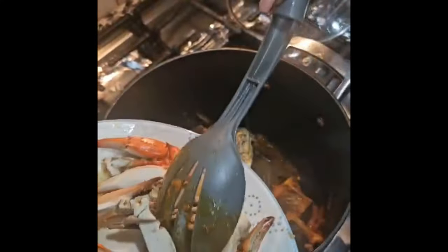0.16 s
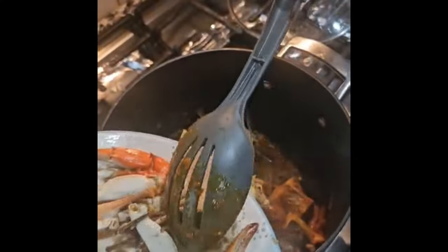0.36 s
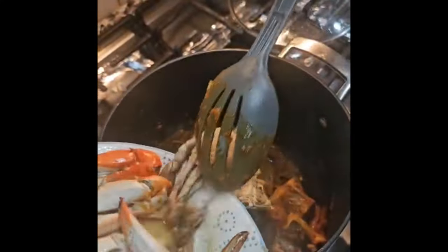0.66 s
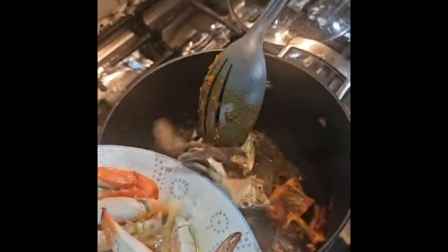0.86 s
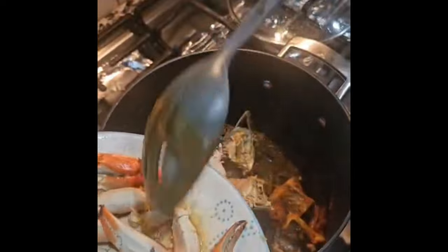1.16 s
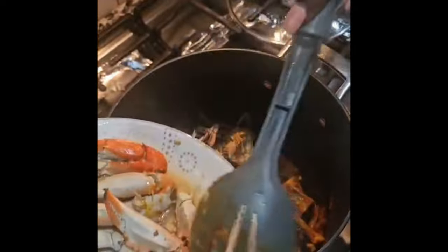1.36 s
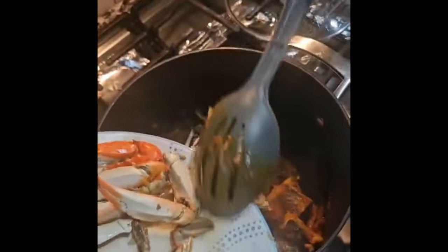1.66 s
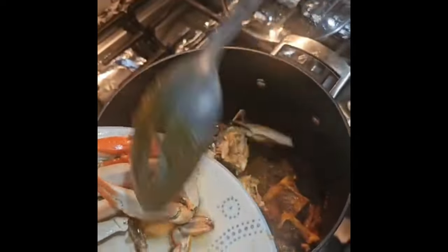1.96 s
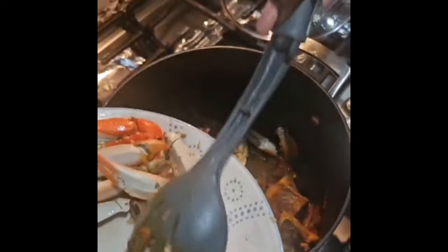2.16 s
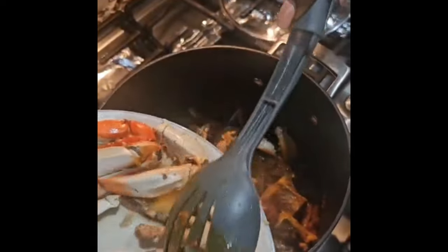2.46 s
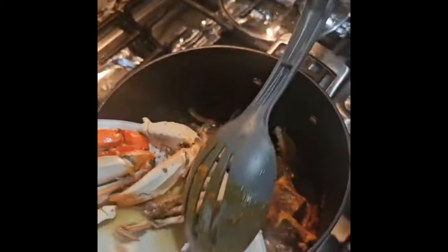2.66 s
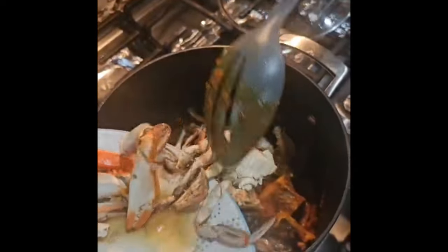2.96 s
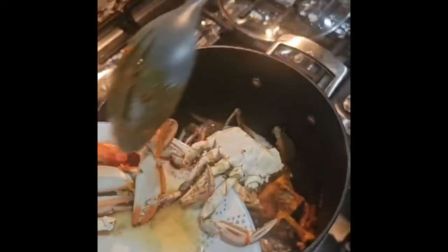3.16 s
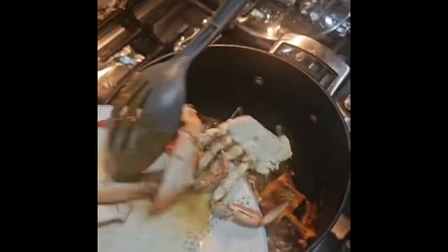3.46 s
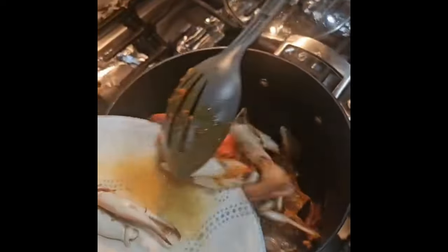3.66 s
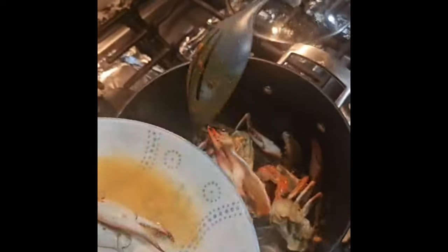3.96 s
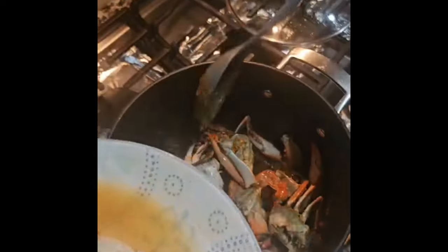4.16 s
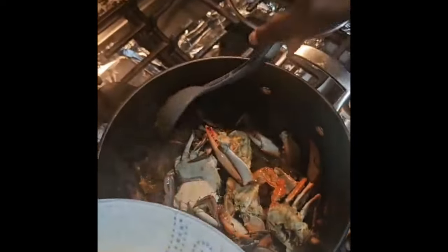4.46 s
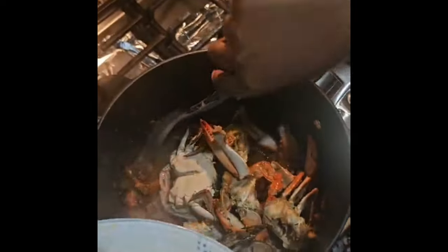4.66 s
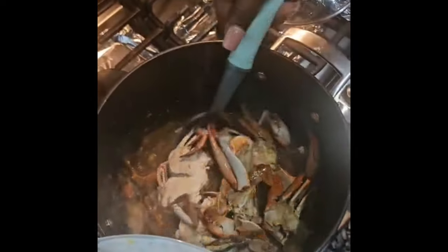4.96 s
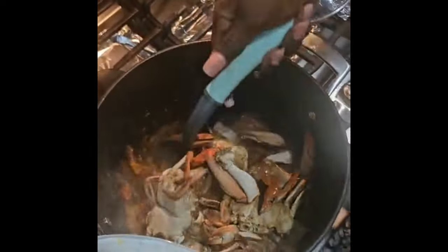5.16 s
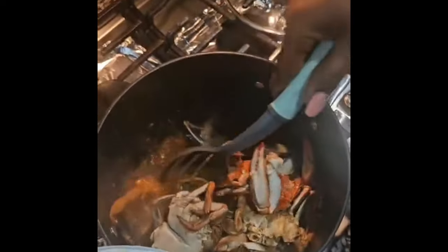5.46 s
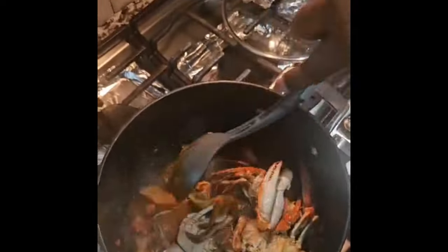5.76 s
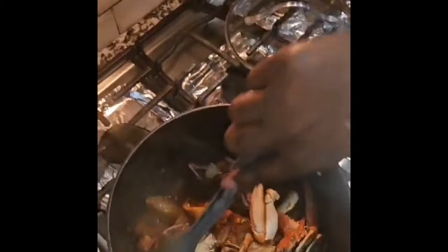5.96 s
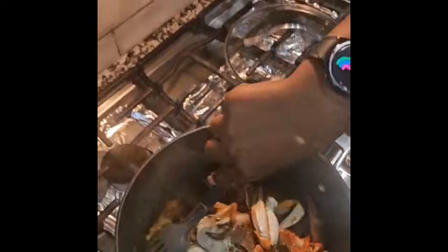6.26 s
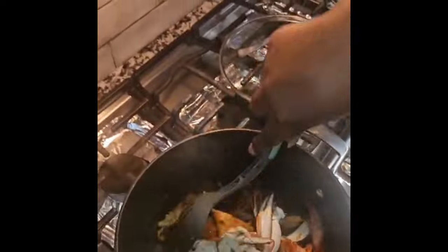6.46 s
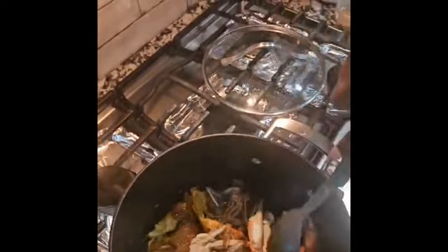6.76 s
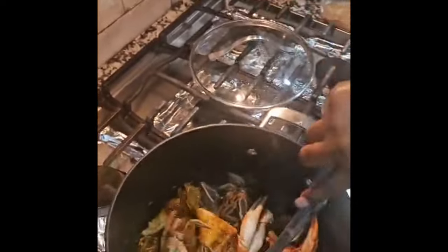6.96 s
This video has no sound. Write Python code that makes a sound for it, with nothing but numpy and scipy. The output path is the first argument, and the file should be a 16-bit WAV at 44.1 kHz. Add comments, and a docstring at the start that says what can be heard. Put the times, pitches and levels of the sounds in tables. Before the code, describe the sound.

Hard shells click and clatter off a plate into a frying pot with dull thuds and flaring sizzle, followed by softer stirring and wall scrapes.

```python
"""A kitchen stove: a plastic slotted spoon scrapes cooked crab off a china plate into frying sauce, then stirs.
Shell ticks are noise bursts that ring small resonances and the plate's modes; one strike is especially hard.
Soft thuds ring the pot and boom on the stove, shoved food groans in two low tones, and the pot's rim rings.
Clumped random slips make the scraping; steam hiss, pitched pops and fine spray make the sizzle.
A low hum with one broad tone and the rumble of the rocking pot lie beneath; short echoes give the room."""
import sys
import numpy as np
from scipy import signal
from scipy.fft import rfft, irfft
from scipy.io import wavfile

SR = 44100
rng = np.random.default_rng(int(sys.argv[2]) if len(sys.argv) > 2 else 0)


def file_out(sig):
    """Save sig as 16-bit WAV at sys.argv[1]."""
    # one column per channel
    cols = np.atleast_2d(sig).T
    # limit, then scale
    lim = np.clip(cols, -1, 1)
    pcm = np.round(lim * 32767).astype(np.int16)
    wavfile.write(sys.argv[1], SR, pcm)


N = 313551
TIME = np.arange(N) / SR  # seconds

# Frying, livelier while stirring bares the hot bottom: time_s, level_db
FRYING_LEVEL = [(0, -60), (1.2, -57.5), (2.3, -59.5), (3.3, -59.5), (4.45, -59.5), (5.0, -57),
                (5.85, -56.5), (6.4, -59), (6.8, -61), (7.11, -66)]
# Wet food meets the hot pot and the sizzle flares: start_s, level_db
FLARES = [(.9, -61), (1.62, -55), (2.0, -54.5), (3.62, -51), (3.8, -45.5), (4.17, -53.5), (6.95, -50.5)]
# Relative spectra of steam hiss and pops, and of the finest fizz: freq_hz, density_db
SIZZLE_COLOUR = [(400, -33), (1000, -18), (2500, 4.5), (5000, 4.5), (8000, 2), (11000, -4), (14000, -2),
                 (16000, -4.5)]
SPRAY_COLOUR = [(2000, -38), (6000, -11), (9000, -4), (12000, 3), (14000, 1), (16000, -1.5)]
# Relative spectra of the kitchen hum and of the pot rocking on its grate: freq_hz, density_db
HUM_COLOUR = [(15, -73), (25, -60), (54, -22), (81, -34), (108, -19), (162, -6), (221, -2.5), (243, -5),
              (401, 2.5), (578, -9), (936, -8), (1200, -12), (1490, -9), (2100, -16.5), (2500, -15),
              (3250, -12.5), (5500, -120)]
RUMBLE_COLOUR = [(15, -4), (30, -17), (47, 4), (62, 1), (85, -8), (130, 14), (200, 0), (400, -72),
                 (1000, -101)]
# Pushes of the spoon, first over the plate, then through the pot: start_s, length_s, rubbing_db
STROKES = [(0, 0.038, -47.5), (0.563, 0.43, -48), (1.5, 0.3, -43.5), (1.95, 0.44, -51.5),
           (2.55, 0.071, -51), (2.85, 0.078, -51), (3.06, .04, -50), (3.415, 0.02, -43),
           (3.58, 0.39, -43.5), (4.106, 0.77, -54.5), (4.7, 0.047, -44.5), (4.84, 0.37, -45.5),
           (6.18, 0.3, -49.5), (6.9, 0.15, -48), (7.02, 0.035, -43)]
# Relative spectra of rubbing on the plate and of stirring in the pot: freq_hz, density_db
SCRAPE_COLOUR = [(150, -17), (400, 2), (650, -5.5), (950, 4), (1500, -2.5), (1900, -2), (2600, -7),
                 (4500, -3), (7000, -15), (14000, -30)]
STIR_COLOUR = [(150, -13), (400, 7), (650, 1), (860, 4), (1100, 0.5), (1400, 2.5), (1900, -2.5),
               (2800, -3.5), (4500, -4), (7000, -7.5), (14000, -27)]
# Distinct contacts of spoon and shell: start_s, strength_db, centre_hz, falloff_db_per_octave (either side),
# crunch_s, shell_hz (the piece's own resonance), shell_db (its height), plate_db (china ring),
# pan_db (left minus right)
CLICKS = [(0.011, -1, 955, 10, 0.0035, 1580, 8, -17, -2), (0.157, -2, 1650, 6.5, 0.0014, 1370, 5.5, -25, 1),
          (.29, -8, 1500, 11, 0.0027, 1520, 10, -6, 4), (0.338, -3, 1650, 21, 0.0014, 1590, 12.5, -2, 0),
          (0.516, -6, 875, 9, 0.0041, 6440, 20, -9, -3), (0.693, 2, 1560, 7.5, 0.0031, 3250, 9.5, -3.5, -2),
          (.705, -3, 2200, 4.5, 0.0017, 4480, 5, -18, 3), (0.7607, 4.5, 3140, 3, 0.0024, 1010, -1, -6.5, 0),
          (0.7836, 2.5, 1560, 16, 0.0055, 1520, 9, 3.5, -4), (.82, -8.5, 3500, 3.5, 0.0015, 5600, 3, -6, 1),
          (0.955, -0.5, 1300, 3, 0.006, 1490, 4.5, -2, 1), (.98, -4, 2000, 4.5, 0.0018, 1500, 0, -6, -3),
          (1.0635, -17, 3120, -2, 0.0029, 5340, 18.5, -10, 5),
          (1.0806, -5.5, 2930, 6.5, 0.0033, 4430, 9.5, 9, -3),
          (1.081, 1.5, 1100, 16, 0.0022, 1380, 11, -27, -2),
          (1.483, 3, 1740, 6, 0.0018, 3240, 8, -18, -1.5), (1.5319, 0, 2120, 7, 0.0014, 3360, 10, -5, 3),
          (1.5526, 4, 2320, 9.5, 0.0023, 4300, 11, -17, 0),
          (1.6222, 10.5, 4050, 0.5, 0.0029, 2450, 7, 11, -2.5),
          (1.6245, 10.5, 3320, 19, 0.0015, 3450, 6, -35, 7), (1.653, 2, 1400, 8, 0.0025, 1490, 5, -8, 10),
          (1.668, 6.5, 2800, 9, 0.005, 4400, 6, 0.5, -1), (1.675, -8, 3200, 3, .002, 5600, 8, 7, -4),
          (1.706, -21, 2500, 12, .0015, 2500, 6, 2, 0), (1.783, 10.5, 970, 7.5, 0.0071, 1480, 6, -21, 2),
          (1.7904, -5, 1480, 4, 0.0023, 1330, 22.5, 8.5, -5),
          (1.8245, -3, 2980, 5.5, 0.0013, 3070, -1, -10, -5), (1.834, 5, 2590, 9, 0.0035, 4470, 16, -1, -1),
          (1.843, -4, 4000, 18, .003, 5300, 12, -6, 6), (2.0055, -1, 900, 3, 0.0043, 5740, 8.5, -9, 2.5),
          (2.16, 1.5, 5020, 3, 0.0026, 8000, 5, -35, 2), (2.247, -11, 1500, 6, .003, 1520, 10, -3, 0),
          (2.26, -5, 1000, 6.5, 0.0014, 1240, 7, -16, -7), (2.296, -7.5, 2380, 6, 0.0017, 2920, 16, -11, 3),
          (2.325, -14, 1200, 9, .003, 1100, 6, -4, -4), (2.379, -16.5, 2200, 8, .003, 2870, 12, -1, 4),
          (2.4503, -2.5, 2150, 12, 0.0008, 3010, 8, -14, 3), (2.585, -13, 2200, 6, .004, 5200, 11, -6, 6),
          (2.637, -16, 2200, 3, .003, 3300, -2, -2, 5), (2.688, -14, 1900, 10, 0.0037, 2530, 8, 5, 0),
          (2.859, -13, 2510, 8, 0.003, 2480, -2, -1, 3), (2.877, -14, 4500, 10, .004, 5400, 3, 4, 0),
          (2.909, -13.5, 2300, 9, .004, 2510, 3, 2.5, -2),
          (3.0694, -20.5, 1840, -0.5, 0.0052, 1430, 25, -10, 4),
          (3.133, -14, 2100, 5.5, 0.0044, 1470, 19, 3, 0), (3.215, -6.5, 1380, 11, .003, 1900, -1, -16, 3),
          (3.4208, 2, 1870, 6.5, 0.00093, 3350, 9.5, -14, 3.5),
          (3.43, -16, 3400, 18, .007, 3750, 8, -12, 0), (3.473, -2, 883, 2.5, 0.003, 3140, 1, -16, 2),
          (3.6157, 9, 1750, 9.5, 0.00076, 1520, 15, -1.5, -0.5),
          (3.629, -3, 1700, 14, 0.0015, 1520, 11, 11, -3), (3.6483, 2, 2630, 12, 0.002, 3520, 14.5, -20, 4),
          (3.662, -8, 3200, 12, .002, 3200, 12, -6, -6), (3.6822, 4, 1150, 4, 0.0022, 1050, 11, -8, 3),
          (3.719, -4, 2100, 5, 0.0022, 2400, 11, -1, -1), (3.736, -4, 1600, 8, .002, 1480, 3, 0, -1),
          (3.7945, 8, 2820, 12.5, 0.0025, 3060, 12.5, 0, 1),
          (3.807, -5, 1890, 14, 0.0017, 3100, 0, 6.5, -11),
          (3.824, -13.5, 7000, -6, 0.0037, 12000, 7, -33, 0), (3.822, 1, 1000, 17, 0.0018, 2500, 4, -7, 0),
          (3.841, 0.5, 3240, 14, 0.0028, 3480, 7.5, 2, -3), (3.8645, 5, 1130, 14, 0.0018, 1000, 3, 0, -3),
          (3.89, 0, 1300, 5, 0.0015, 1340, 11, -1, -1), (3.908, -10, 3440, 9, 0.0094, 4400, 22, -12, -3),
          (3.9245, -0.5, 2000, 0, 0.005, 2240, 14, 1.5, 1.5), (3.936, -5, 2600, 6.5, .002, 2450, 8, -1, -2),
          (3.948, -7, 3000, 1, .002, 3300, 6, -2, -2), (3.986, -2, 4500, 7, .003, 4470, 8, -1, -3),
          (3.9732, 14, 5030, 21, 0.0056, 4330, -3, -17, 2),
          (4.0214, 5.5, 3370, 4, 0.0025, 12500, 10, -13, 5),
          (4.032, 6, 3440, 5.5, 0.0098, 4350, 7, -15, -2), (4.172, 9, 9100, 2.5, 0.0012, 5530, 5, -36, 2.5),
          (4.8405, -1, 1670, 3, 0.0078, 1460, 5, -32, 2), (4.858, -2, 1000, 3, 0.017, 895, 11, -40, 1),
          (4.88, -5, 1200, 3, 0.006, 1430, 7, -40, 4), (4.925, -12.5, 950, 6, 0.0046, 835, 14, -40, 6),
          (5.087, -10, 1210, 5, .004, 1380, 5, -40, 2), (5.0135, -1.5, 950, 4.5, 0.0044, 860, 16, -38, 1),
          (5.1805, -5, 900, 1.5, 0.0043, 850, 15, -42, 2), (5.227, -8.5, 1100, 2, 0.0038, 1410, 0, -40, 3),
          (5.836, -5.5, 3660, 3.5, 0.0048, 3070, -6, -40, 3),
          (6.207, -13.5, 2800, 8, .003, 2950, 13.5, -40, 2),
          (6.448, -8.5, 2600, 10, 0.008, 4370, 12, -40, 0), (6.47, -4.5, 1600, 9, .003, 1450, 5, -40, 0),
          (6.484, -8, 2200, 7.5, .005, 3050, 6, -40, 0), (6.8965, -2, 1410, 7, 0.0037, 1380, 9.5, -41, 3),
          (6.978, 3.5, 5030, 4, 0.0022, 4200, 5.5, -40, 3), (7.0395, 7, 1700, 13, 0.0019, 2250, 13, -40, 1),
          (7.056, 1, 1200, 6, .003, 1480, 9, -40, 4)]
# Modes of the free china plate, before food and hand detune and damp it: pitch_hz, level_db, t60_s
PLATE_MODES = [(1320, -48, .25), (1455, -37, .4), (1510, -39, .35), (2462, -37, .3), (2510, -36, .4),
               (2600, -42, .2), (3445, -44, .5), (3801, -51, .3), (4021, -51, .3), (4452, -45, .55),
               (5340, -44, .25), (5578, -33, .28), (5625, -41, .3), (6844, -37, .4), (6885, -42, .4),
               (7650, -44, .25), (8180, -33, .65), (8745, -29.5, .2), (9024, -44, .35), (9610, -33.5, .25),
               (11240, -43, .35), (12930, -43, .25), (14725, -36, .25)]
# Soft heavy blows in the pot: start_s, strength_db, top_hz, pot_db (wall ring), boom_hz, boom_db,
# rocking_db (of the pot on its grate)
THUDS = [(0.7415, 16.5, 1470, -3.5, 132, -37.5, -49), (0.756, 12, 560, -8, 153, -43, -64),
         (0.832, -0.5, 920, 2.5, 153, -46, -64), (.888, -5, 524, 0, 132.7, -57, -72),
         (0.9557, 3.5, 960, -0.5, 132, -44.5, -65), (1.038, -14, 514, 2, 131, -58, -71),
         (2.007, -5, 1040, 2, 157.5, -59.5, -67), (2.16, 0, 770, 4.5, 128.3, -46, -52.5),
         (2.245, -11, 500, 6, 130, -56, -61), (3.7123, 9, 1230, 2, 158.8, -37.5, -53),
         (3.726, 6.5, 483, -3, 335.2, -34, -64), (3.926, -3.5, 630, 10.5, 165, -53.5, -53),
         (4.0227, 1.5, 930, -18, 58.4, -55, -67), (4.172, -2, 607, -3.5, 346, -63, -73),
         (4.591, -4, 477, -2, 134.8, -43, -62), (4.738, -2.5, 587, -2, 233, -63, -71),
         (4.856, -6, 890, 5, 166.4, -50, -55), (4.922, -8, 520, 2, 160, -62, -69),
         (5.013, -2, 870, -2, 185, -60, -63), (5.036, -7, 560, 4, 183, -61, -65),
         (5.181, -7, 1020, -9, 195, -62.5, -65), (6.93, -26, 503, -7, 199, -50, -55),
         (6.979, -5.5, 497, 5, 159, -49, -57), (7.04, 8.5, 1440, -6, 165, -46, -45),
         (7.047, -4.5, 905, -4, 163, -53, -60), (7.078, -5, 600, 0, 162, -42, -52)]
# Modes of the loaded pot, before each use detunes or damps them: pitch_hz, level_db, t60_s
POT_MODES = [(333, -47, .4), (352, -52, .2), (397, -45, .35), (434, -49, .3), (528, -51, .35),
             (856, -55, .3), (947, -54, .35), (1028, -56, .3), (1260, -57, .2), (1450, -53, .2)]
# Modes of the pot's metal rim: pitch_hz, level_db, t60_s
RIM_MODES = [(721, -57, .4), (1190, -50.5, .4), (1567, -58, .35), (2270, -46, .11), (2350, -41, .1),
             (2422, -43, .14), (2476, -43, .16), (2950, -53, .16), (3050, -50, .11), (4400, -52, .11)]
# Knocks against the rim: start_s, gain_db
RIM_KNOCKS = [(2.162, 2), (7.02, -7)]
# The spoon's edge drags along the wall of the pot: start_s, length_s, rubbing_db
WALL_STROKES = [(6.115, 0.47, -54), (6.9, 0.072, -46)]
# Relative spectrum of that drag: freq_hz, density_db
WALL_COLOUR = [(500, -14), (900, -11), (1400, -3), (1900, -1), (2350, -3), (3000, 1.5), (3600, -4.5),
               (4400, -2), (7000, -14), (14000, -13)]
# The load is shoved along the bottom and the pot groans: start_s, length_s, level_db, pitch_hz, rocking_db
SHOVES = [(4.443, 0.019, -42, 236, -53), (4.498, 0.016, -47, 226, -60), (4.587, 0.019, -44.5, 336, -66),
          (4.645, 0.075, -46.5, 129.4, -66), (4.858, 0.043, -48, 180, -60), (5.49, 0.13, -52.5, 153, -75),
          (6.115, 0.068, -41.5, 337, -62), (6.19, 0.36, -56.5, 129.2, -74), (6.474, 0.01, -44, 417, -73)]
# How alike the two microphones hear a diffuse field: freq_hz, correlation (unitless)
STEREO_LIKENESS = [(60, 0.76), (150, 0.97), (300, 0.9), (640, 0.61), (1400, 0), (3000, 0), (15000, 0.027)]
# Decay of the room: freq_hz, t60_s
ROOM_DECAY = [(100, 0.68), (400, 0.45), (1500, 0.36), (5000, 0.48), (15000, 0.069)]

HUM_DB = -54.5
ROCK_RISE_S, ROCK_T60_S = 0.056, 0.53  # rocking builds up after a blow and dies away
SIMMER_DB, SPRAY_DB, SPRAY_GROWTH = -59.5, -65, 3.5  # spray level at a simmer; its dB per dB of frying
FLARE_RISE_S, FLARE_T60_S, FLARE_HISS_DB = 0.022, 1, -1.5
PUSH_S, RELEASE_S = 0.012, 0.097  # attack and release of each push
RESTING_DB = -58.5  # between pushes the food still settles
REBOUND_S, REBOUND_DB = 0.0083, -11  # a piece touches a second time, more weakly
TICKS_PER_S, TICK_OVER_RUB_DB = 9, 31  # small ticks follow the strength of the rubbing
TICK_HZ, TICK_FALL_DB, TICK_CRUNCH_S, TICK_PLATE_DB = 1900, 9, 0.0029, 11
SHELL_LOW_HZ, SHELL_HIGH_HZ, SHELL_DB = 1350, 5800, 15
PLATE_GONE_S = 4.6  # no small ticks from here on
LOOSE_SHARE = 0.25  # loose pieces settling, against a unit push
WAVERS_PER_S = 90  # how quickly shifting contact disturbs a ringing mode
HEADROOM, EDGE_HZ = 1.3, 16050  # soft ceiling in amplitude; top of the treble


def amp(db):
    """Turns decibels into gain."""
    return 10 ** (np.asarray(db) / 20)


def unit(x):
    """Scales a sound to rms 1."""
    return x / np.sqrt(np.mean(x ** 2) + 1e-20)


def read(points, hz):
    """Reads a curve on a log-frequency axis."""
    f, value = np.transpose(points)
    return np.interp(np.log(hz + 1), np.log(f + 1), value)


def level(curve):
    """Turns a time and dB curve into a gain for every sample."""
    return amp(np.interp(TIME, *np.transpose(curve)))


def add(mix, start_s, sound):
    """Mixes in a stereo sound at its start time."""
    part = mix[:, max(round(start_s * SR), 0):][:, :sound.shape[1]]
    part += sound[:, :part.shape[1]]


def convolve(x, response):
    """Filters each channel and keeps the length."""
    return signal.fftconvolve(x, np.atleast_2d(response), axes=1)[:, :x.shape[1]]


def pulse(shape_db, size=2048):
    """Makes the minimum-phase pulse whose spectrum in dB is shape_db(hz), floored at -90 dB."""
    hz = abs(np.fft.fftfreq(size, 1 / SR)) + 1
    log_gain = np.log(amp(np.maximum(shape_db(hz), -90)))
    return np.fft.ifft(np.exp(np.conj(signal.hilbert(log_gain)))).real


def colour(x, points):
    """Gives a sound a spectrum, at rms 1."""
    return unit(convolve(x, pulse(lambda hz: read(points, hz), size=8192)))


def pair(x):
    """Blends two unrelated signals into a diffuse field at two close microphones, most alike in the bass."""
    a, b = rfft(x)
    likeness = read(STEREO_LIKENESS, np.fft.rfftfreq(x.shape[1], 1 / SR))
    angle = np.arccos(np.clip(likeness, -1, 1)) / 2
    shared, opposed = a * np.cos(angle), b * np.sin(angle)
    return irfft([shared + opposed, shared - opposed], x.shape[1])


def ring(modes, t, weight_db, apart, waver=0):
    """Sounds dying modes that waver in pitch and level, with phases set apart (radians per Hz) by ear."""
    out = np.zeros((2, len(t)))
    sides = np.array([[1], [-1]])
    for hz, db, t60 in modes:
        phase = rng.uniform(0, 2 * np.pi) + sides * min(hz * apart, np.pi / 4) * rng.choice([-1, 1])
        knots = np.r_[0, 0, rng.standard_normal(64)]
        drift = waver * np.interp(t * WAVERS_PER_S, np.arange(len(knots)), knots)
        decay = np.exp(drift / 2 - np.log(1000) * t / t60)
        out += amp(db + weight_db(hz)) * decay * np.sin(2 * np.pi * hz * t + drift + phase)
    return out


def low_pass_db(hz, edge_hz):
    """Gives the loss of treble from a contact of finite softness."""
    return -10 * np.log10(1 + (hz / edge_hz) ** 4)


def clumps(per_s, depth_db):
    """Makes a gain that wanders through per_s random levels a second, at rms 1."""
    knots = rng.standard_normal(4096)
    return unit(amp(depth_db * np.interp(TIME * per_s, np.arange(len(knots)), knots)))


def grains(per_s, spread_db, size=6000):
    """Scatters tiny impulses, a few of them much larger than the rest."""
    when, rank, left, right = rng.random((size, 4))[:int(per_s * N / SR)].T
    height = amp(spread_db * np.minimum(-np.log(1 - rank), 4))
    out = np.zeros((2, N))
    out[:, (when * N).astype(int)] = height * np.cos(2 * np.pi * np.array([left, right]))
    return unit(out)


def crackle(per_s, spread_db, low_hz, high_hz, cycles, count=16):
    """Turns grains of many sizes into short pings on a ladder of pitches."""
    out, t = np.zeros((2, N)), TIME[:400]
    for hz in np.geomspace(low_hz, min(high_hz, SR / 3), count):
        ping = np.sin(2 * np.pi * hz * t) * np.exp(-t * hz / cycles)
        ping = unit(ping)[None] * np.sqrt(hz)
        out += signal.oaconvolve(grains(per_s / count, spread_db), ping, axes=1)[:, :N]
    return pair(out)


def surges(events, rise_s, t60):
    """Lets each event, start_s and level_db, swell and die away; their powers add."""
    power = np.zeros(N)
    for s, db in events:
        t = np.maximum(TIME - s, 0)
        swell = np.minimum(t / rise_s, 1)
        decay = np.exp(-np.log(1000) * np.maximum(t - rise_s, 0) / t60)
        power += (swell * amp(db) * decay) ** 2
    return np.sqrt(power)


def pushes(strokes):
    """Gives every push of the spoon an attack, a hold and a release; the strongest wins."""
    gain = np.zeros(N)
    for s, length, db in strokes:
        attack = np.clip((TIME - s) / PUSH_S, 0, 1)
        release = np.exp(-np.maximum(TIME - s - length, 0) / RELEASE_S)
        gain = np.maximum(gain, amp(db) * attack * release)
    return gain


def rubbing():
    """Tells how hard the spoon rubs the food, never below the level of settling food."""
    return np.maximum(pushes(STROKES), amp(RESTING_DB))


def sizzle(fizz_db=2, pops_db=-4):
    """Countless steam bubbles merge into a hiss; larger ones burst singly, at many pitches."""
    fizz = colour(pair(rng.standard_normal((2, N))), SIZZLE_COLOUR)
    pops = crackle(per_s=900, spread_db=5, low_hz=1500, high_hz=13150, cycles=4)
    pops = colour(pops, SIZZLE_COLOUR)
    spray = colour(rng.standard_normal((2, N)) * clumps(per_s=130, depth_db=2.0), SPRAY_COLOUR)
    frying = level(FRYING_LEVEL)
    flare = surges(FLARES, FLARE_RISE_S, FLARE_T60_S)
    body_gain = np.hypot(frying, amp(FLARE_HISS_DB) * flare)
    fine = amp(SPRAY_DB) * (frying / amp(SIMMER_DB)) ** SPRAY_GROWTH
    return body_gain * (amp(fizz_db) * fizz + amp(pops_db) * pops) + np.hypot(fine, flare) * spray


def background(drone_hz=420, drone_width_hz=45, drone_db=-61):
    """A steady airy hum holds one broad tone; noise rumbles as blows and shoves rock the pot."""
    hum = colour(pair(rng.standard_normal((2, N))), HUM_COLOUR)
    tone = pulse(lambda hz: -20 * np.log10(1 + ((hz - drone_hz) / drone_width_hz) ** 2), size=8192)
    drone = unit(convolve(pair(rng.standard_normal((2, N))), tone))
    rumble = colour(pair(rng.standard_normal((2, N))), RUMBLE_COLOUR)
    nudges = [(row[0], row[-1]) for row in list(THUDS) + list(SHOVES)]
    rocking = surges(nudges, ROCK_RISE_S, ROCK_T60_S)
    return amp(HUM_DB) * hum + amp(drone_db) * drone + rocking * rumble


def scraping(rub_db=-5, china_db=-10, stir_db=-4, wall_db=-9, wall_damp_s=0.0049, wall_tilt_db=3,
             slides_off_s=3.5):
    """Shell sticks and slips under the spoon in clumps, sounding first the plate's modes, then the pot's."""
    slips = crackle(per_s=1800, spread_db=2.8, low_hz=320, high_hz=10900, cycles=1.3)
    slips = slips * clumps(per_s=70, depth_db=4) * clumps(per_s=18, depth_db=1)
    rub = colour(slips, SCRAPE_COLOUR)
    china = plate_ring(TIME[:SR // 3], lambda hz: low_pass_db(hz, edge_hz=7500))
    china = unit(convolve(rub, china))
    scrape = amp(rub_db) * rub + amp(china_db) * china
    t = TIME[:SR // 4]
    wall = ring(POT_MODES, t, lambda hz: wall_tilt_db * np.log2(hz / 1000), apart=0.00026)  # dB per octave
    wall = wall * np.exp(-t / wall_damp_s)
    stir = amp(stir_db) * colour(slips, STIR_COLOUR) + amp(wall_db) * unit(convolve(slips, wall))
    on_plate = np.clip((slides_off_s - TIME) * 10, 0, 1)
    return rubbing() * (on_plate * scrape + (1 - on_plate) * stir)


def plate_ring(t, weight_db, damp_s=0.019, linger_db=-23, rise_s=0.0017, hold=0.66, load=0.0028):
    """The plate rings loudly at first; food and hand choke it to a faint lingering tone and shift its pitch."""
    choke = (np.exp(-t / damp_s) + amp(linger_db)) * (1 - np.exp(-t / rise_s))
    modes = [(hz * (1 + load * rng.uniform(-1, 1)), db, t60 * hold) for hz, db, t60 in PLATE_MODES]
    return ring(modes, t, weight_db, apart=0.00052, waver=0.7) * choke


def small_ticks(size=200):
    """Bits of shell of any size slip on the plate, one at random in each tick period: rows like CLICKS."""
    rub, rows = rubbing(), []
    for k, (when, piece, side) in enumerate(rng.random((size, 3))):
        s = (k + when) / TICKS_PER_S
        if s < PLATE_GONE_S:
            db = 20 * np.log10(rub[int(s * SR)]) + TICK_OVER_RUB_DB
            shell_hz = SHELL_LOW_HZ * (SHELL_HIGH_HZ / SHELL_LOW_HZ) ** piece
            pan_db = 10 * (side - 0.5)
            rows.append((s, db, TICK_HZ, TICK_FALL_DB, TICK_CRUNCH_S, shell_hz, SHELL_DB, TICK_PLATE_DB, pan_db))
    return rows


def clicks(snap=0.098, crunch=0.52, ring_db=1, shell_q=13, rise_s=0.00083, reach_hz=7500, hardening=0.78,
           choke_s=0.0093, pressing=0.38):
    """A snap, a short crunch and a rebound ring a piece of shell; on the plate they also wake the china."""
    out, t = np.zeros((2, N)), TIME[:SR // 4]
    for s, db, hz, slope, length, shell_hz, shell_db, plate_db, pan_db in list(CLICKS) + small_ticks():
        def shape_db(f):
            octaves = np.log2(f / hz)
            low_cut_db = -10 * np.log10(1 + (350 / f) ** 4)
            return -slope * octaves ** 2 / np.sqrt(1 + octaves ** 2) + low_cut_db

        def shell(f):
            detune = 2 * shell_q * (f / shell_hz - 1)
            return 10 * np.log10(1 + amp(shell_db) ** 2 / (1 + detune ** 2))

        burst = pair(rng.standard_normal((2, len(t))))
        burst = burst * np.exp(-t / max(length, 0.0005)) * (1 - np.exp(-t / rise_s))
        burst *= crunch / np.linalg.norm(burst, axis=1, keepdims=True)
        burst[[0, 1], [0, 4]] += snap  # reaches the right four samples later
        add(burst, REBOUND_S, amp(REBOUND_DB) * burst[::-1])  # sides swapped
        sound = convolve(burst, pulse(lambda f: shape_db(f) + shell(f)))
        if plate_db > -30:
            edge_hz = reach_hz * amp(hardening * db)  # harder blows reach higher modes
            damp_s = choke_s / amp(pressing * db)  # a light tap leaves the plate freer to ring
            china = plate_ring(t, lambda f: shape_db(f) + low_pass_db(f, edge_hz), damp_s)
            sound += amp(plate_db + ring_db) * china
        add(out, s, amp(db + np.array([[pan_db], [-pan_db]]) / 2) * sound)
    return out


def thuds(low_hz=300, boom_t60=0.58, boom_rise_s=0.00048, scatter_s=0.0064, partner=1.4, partner_db=-7,
          knock_hz=1190, knock_width_hz=340, knock_db=5.5, full_blow_db=17, base_hz=385, base_width_hz=45,
          base_db=10, hollow_hz=620, hollow_width_hz=130, hollow_db=-5, load=0.018):
    """A soft blow pushes the pot and rings its wall; the stove beneath answers with a slower, unsteady boom."""
    out, t = np.zeros((2, N)), TIME[:SR * 2 // 3]
    for s, db, top_hz, pot_db, boom_hz, boom_db, _ in THUDS:
        def shape_db(f):
            return -10 * np.log10((1 + (f / top_hz) ** 20) * (1 + (low_hz / f) ** 4))

        def knock(f):  # a dead, woody note that hard blows bring out
            return knock_db * min(amp(db - full_blow_db), 1) / (1 + ((f - knock_hz) / knock_width_hz) ** 2)

        def base(f):  # the low note of the pot's bottom, deadened by the food, and the hollow above it
            low_note = base_db / (1 + ((f - base_hz) / base_width_hz) ** 2)
            return low_note + hollow_db / (1 + ((f - hollow_hz) / hollow_width_hz) ** 2)

        push = pair(rng.standard_normal((2, len(t)))) * np.exp(-t / scatter_s)
        push *= LOOSE_SHARE / np.linalg.norm(push[0])
        push[:, 0] += 1
        blow = convolve(push, pulse(lambda f: shape_db(f) + knock(f) + base(f)))
        # The food shifts and retunes the wall.
        modes = [(hz * (1 + load * rng.uniform(-0.85, 1)), mode_db, t60) for hz, mode_db, t60 in POT_MODES]
        wall = amp(pot_db) * ring(modes, t, shape_db, apart=0.0009, waver=0.7)
        boom_modes = [(boom_hz, 0, boom_t60), (boom_hz * partner, partner_db, boom_t60 / 2)]
        boom = ring(boom_modes, t, lambda hz: boom_db, apart=0.00033, waver=0.5)
        boom *= unit(clumps(per_s=55, depth_db=2.5)[:len(t)])
        add(out, s, amp(db) * (blow + wall) + boom * (1 - np.exp(-t / boom_rise_s)))
    return out


def rim(rise_s=0.00084, rub_db=-1, ring_db=-9, unsteady=0.42):
    """The metal rim rings briefly when knocked, and sings roughly as the spoon drags along the wall."""
    out, t = np.zeros((2, N)), TIME[:SR // 3]
    metal = ring(RIM_MODES, t, lambda hz: 0, apart=0.000086, waver=unsteady) * (1 - np.exp(-t / rise_s))
    for s, db in RIM_KNOCKS:
        add(out, s, amp(db) * metal)
    slips = pair(grains(per_s=1800, spread_db=2.5, size=14000)) * clumps(per_s=110, depth_db=3)
    drag = amp(rub_db) * colour(slips, WALL_COLOUR) + amp(ring_db) * unit(convolve(slips, metal))
    return out + pushes(WALL_STROKES) * drag


def shoves(rise_s=0.0045, release_s=0.012, partner=1.24, partner_db=-4, sag_t60=1.7):
    """Shell judders over the pot bottom: two low, unsteady tones swell softly and stop with the push."""
    out, t = np.zeros((2, N)), TIME[:SR // 2]
    for s, length, db, hz, _ in SHOVES:
        modes = [(hz, 0, sag_t60), (hz * partner, partner_db, sag_t60)]
        groan = ring(modes, t, lambda f: db, apart=0.0005, waver=0.9)
        release = np.exp(-np.maximum(t - length, 0) / release_s)
        add(out, s, groan * np.minimum(t / rise_s, 1) * release)
    return out


def kitchen(x, early_db=-11, tail_db=-13, early_s=0.0066):
    """Sparse quick echoes from pot, stove and tiles lead into the short noise tail of the room."""
    hz, t, z = signal.stft(pair(rng.standard_normal((2, SR // 2))), SR, nperseg=256)
    decay = np.exp(-np.log(1000) * t / read(ROOM_DECAY, hz)[:, None])
    tail = signal.istft(z * decay, SR, nperseg=256)[1]
    t = TIME[:tail.shape[1]]
    early = pair(rng.standard_normal(tail.shape) * (rng.random(tail.shape) < 0.05))
    early = early * np.exp(-t / early_s) * (t > 0.002)
    tail *= t > 0.008
    early_part = amp(early_db) * early / np.linalg.norm(early[0])
    tail_part = amp(tail_db) * tail / np.linalg.norm(tail[0])
    return convolve(x, early_part + tail_part)


def scene():
    """Sets contacts, scraping and a slightly left-leaning sizzle in the kitchen, over the background."""
    near = clicks() + thuds() + shoves() + rim() + scraping() + sizzle() * amp([[0.4], [-0.4]])
    return near + kitchen(near) + background()


def record(dry):
    """Rounds strong peaks off softly at the headroom, then cuts the treble above the band edge."""
    rounded = HEADROOM * np.tanh(dry / HEADROOM)
    band_limit = signal.firwin(401, EDGE_HZ, window=("kaiser", 8), fs=SR)
    return signal.oaconvolve(rounded, band_limit[None], "same")


dry = scene()
out = record(dry)
file_out(out)
```